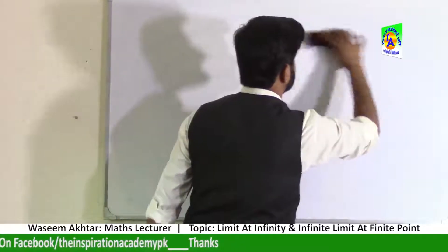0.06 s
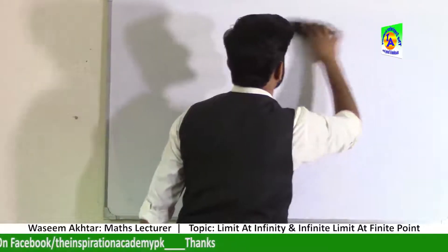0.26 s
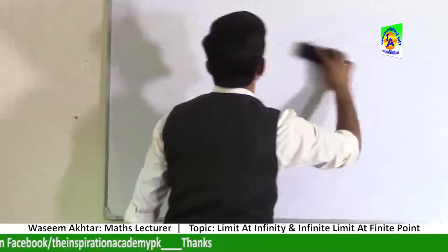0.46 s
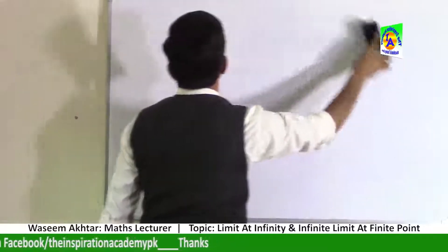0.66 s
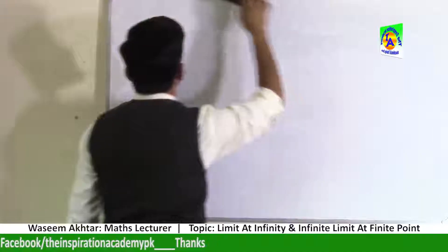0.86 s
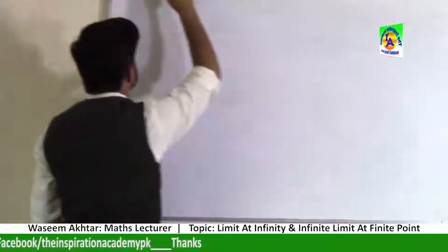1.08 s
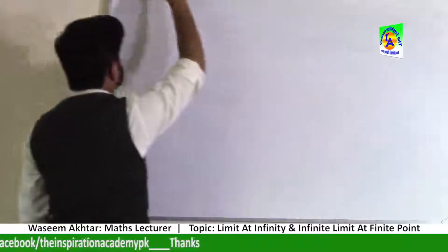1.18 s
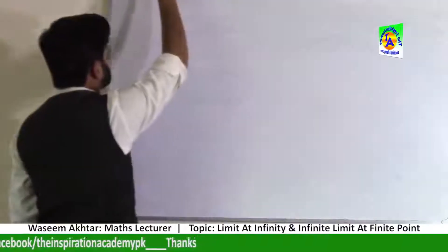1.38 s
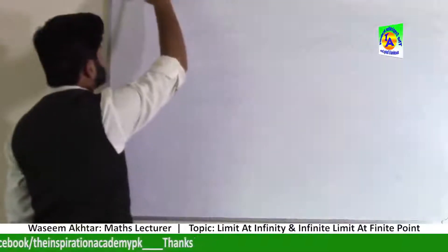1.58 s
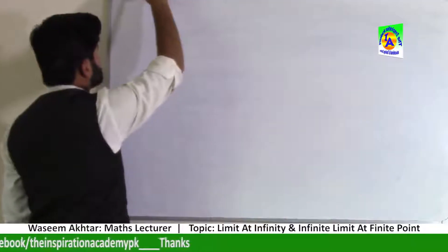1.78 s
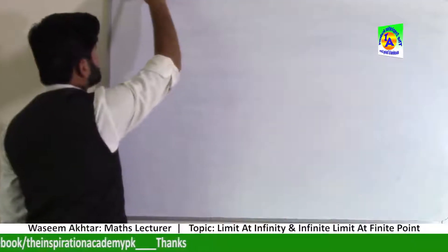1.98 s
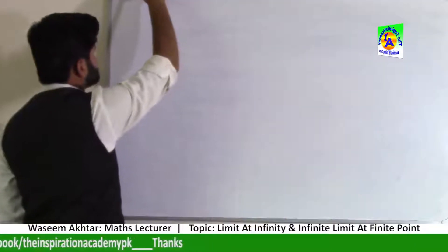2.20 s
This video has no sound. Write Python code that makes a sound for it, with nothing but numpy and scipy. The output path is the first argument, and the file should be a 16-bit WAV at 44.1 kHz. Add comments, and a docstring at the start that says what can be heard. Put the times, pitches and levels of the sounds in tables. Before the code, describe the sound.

A felt eraser rubs across a whiteboard in quick, softly hissing strokes, then fades. A light tap with a low thud follows, then a soft knock and one hollow click, over faint classroom hum.

```python
"""A felt eraser hisses across a whiteboard in quick strokes: countless tiny fibre slips, with catches,
flicks and thin squeals. A faint hiss lingers. A light tap comes with a low thud of the flexing board.
A soft knock and one hollow click follow, the click a cavity pulse with sharp ringing contacts.
The classroom rings briefly over low rumble, mains hum, hiss and a faint electrical buzz."""
import sys
import numpy as np
from scipy import signal
from scipy.fft import rfft, irfft, next_fast_len
from scipy.io import wavfile
from scipy.ndimage import uniform_filter1d

SR = 44100
rng = np.random.default_rng(int(sys.argv[2]) if len(sys.argv) > 2 else 0)


def unload_audio(sound):
    """Save the sound as a 16-bit wav file, at the path given as the first command line argument."""
    columns = np.transpose(np.atleast_2d(sound))
    # keep every value between -1 and 1, then stretch to whole-number steps
    steps = np.round(np.clip(columns, -1, 1) * 32767)
    wavfile.write(sys.argv[1], SR, steps.astype(np.int16))


N = 98960
TIME_S = np.arange(N) / SR


def amp(db):
    """Decibels to gain."""
    return 10 ** (np.asarray(db) / 20)


def unit(x):
    """Scale to rms 1."""
    return x / np.sqrt(np.mean(x ** 2) + 1e-20)


def along(points, hz):
    """Interpolate (freq_hz, value) points on a log axis."""
    freqs_hz, values = np.transpose(points)
    return np.interp(np.log(hz + 1), np.log(freqs_hz + 1), values)


def level(points):
    """Gain per sample from (time_s, level_db) points."""
    return amp(np.interp(TIME_S, *np.transpose(points)))


def swell(centre_s, width_s):
    """Gaussian rise and fall, peak 1."""
    return np.exp(-2 * ((TIME_S - centre_s) / width_s) ** 2)


def filtered(x, response):
    """Zero-phase filter with gain response(hz)."""
    size = next_fast_len(N + SR // 2)
    return irfft(rfft(x, size) * response(np.fft.rfftfreq(size, 1 / SR)), size)[..., :N]


def coloured(x, spectrum):
    """x shaped by a spectrum, rms 1."""
    return unit(filtered(x, lambda hz: amp(along(spectrum, hz))))


def noise(spectrum):
    """Coloured noise, rms 1."""
    return coloured(rng.standard_normal(N), spectrum)


def band(centre_hz, q):
    """Noise in one resonance, rms 1."""
    white = rng.standard_normal(N)
    return unit(filtered(white, lambda hz: 1 / (1 + (q * (hz / centre_hz - centre_hz / (hz + 1))) ** 2)))


def grainy_noise(streak_db, grain_db, grains_per_s=900):
    """Noise with sparse grains and shifting streaks of colour."""
    grains = (rng.random(N) < grains_per_s / SR) * rng.standard_normal(N)
    frames = signal.stft(rng.standard_normal(N) + amp(grain_db) * unit(grains), nperseg=512)[2]
    streaks = uniform_filter1d(rng.standard_normal(frames.shape), size=4, axis=0)
    streaks = uniform_filter1d(streaks, size=9, axis=1)
    return signal.istft(frames * amp(streak_db * unit(streaks)), nperseg=512)[1][:N]


# Hiss envelope, one list per stroke: time_s, relative_db
STROKES = [
    [(0.0, -49.5), (0.08, -50), (0.11, -54)],
    [(0.15, -55), (0.172, -57), (0.232, -52), (0.32, -55.5)],
    [(0.36, -56), (0.546, -50), (0.566, -55.5), (0.678, -52.5), (0.8, -68.5), (0.86, -92)],
]
# Felt spectrum, pressed hard: freq_hz, density_db
FELT_HARD = [(400, -26), (900, -25), (1900, -10.5), (2600, -16), (3400, -11.5), (4700, -8.5), (5500, -12),
             (6000, -6), (8500, 1.5), (13300, 1.5), (15800, -8)]
# Felt spectrum, pressed lightly: freq_hz, density_db
FELT_LIGHT = [(400, -21.5), (800, -19), (1300, -13.5), (2300, -17), (3300, -12), (5700, -15), (6900, -6),
              (7600, -7), (9400, 0), (13500, -3), (15800, -9.5)]

def wipe(gain_db=1, ease_centre_s=0.24, ease_length_s=0.15):
    """Tiny slips of felt: the hiss follows hand speed and thins as the pressure eases."""
    points = np.concatenate(STROKES)
    fade_out = [points[-1, 0] + 0.045, -110]
    envelope = amp(gain_db) * level(np.vstack([points, fade_out]))
    slips = grainy_noise(streak_db=2, grain_db=-8)
    eased = np.clip((TIME_S - ease_centre_s) / ease_length_s + 0.5, 0, 1)
    return envelope * ((1 - eased) * coloured(slips, FELT_HARD) + eased * coloured(slips, FELT_LIGHT))


# Room rumble spectrum: freq_hz, density_db
RUMBLE_SPECTRUM = [(15, -13.5), (25, -5), (38, -3.5), (50, -4), (75, -12.5), (118, -4.5), (145, -7),
                   (185, -16), (300, -16.5), (420, -24.5), (600, -30), (900, -42.5), (1600, -90.5)]
# Background hiss spectrum: freq_hz, density_db
HISS_SPECTRUM = [(300, 1), (700, 2.5), (1300, 4), (2500, -4.5), (4300, -9.5), (5500, -6), (8000, -10.5),
                 (12000, -13.5), (15800, -20)]
# Electrical tick filter: freq_hz, gain_db
BUZZ_FILTER = [(500, -46), (3000, -3.5), (5500, 2.5), (8000, 0.5), (12000, -8.5), (15800, -13.5)]
# Brief dips in hiss and buzz: centre_s, width_s, depth_db
DIPS = [(1.974, 0.015, 20), (2.064, 0.011, 23), (2.114, 0.021, 11.5), (2.151, 0.011, 23.5),
        (2.207, 0.016, 29)]

def background(mains_hz=50, hum_db=-61.5, rumble_db=-63.5, hiss_db=-77, tick_db=-52):
    """Rumble, mains hum, hiss and a buzz of one tick per mains half cycle."""
    tick_times_s = np.arange(0.0089, TIME_S[-1], 0.5 / mains_hz)
    ticks = np.zeros(N)
    ticks[(tick_times_s * SR).astype(int)] = amp(tick_db + rng.standard_normal(len(tick_times_s)))
    buzz = filtered(ticks, lambda hz: amp(along(BUZZ_FILTER, hz)))
    hum = amp(hum_db) * np.sqrt(2) * np.sin(2 * np.pi * mains_hz * TIME_S)
    rumble = amp(rumble_db) * noise(RUMBLE_SPECTRUM)
    hiss = amp(hiss_db) * noise(HISS_SPECTRUM)
    dip_db = sum(depth_db * swell(centre_s, width_s) for centre_s, width_s, depth_db in DIPS)
    return hum + rumble + amp(-dip_db) * (hiss + buzz)


# Felt squeals: centre_s, width_s, level_db, pitch_hz
SQUEALS = [(0.057, 0.09, -63.5, 5370), (.23, 0.063, -64, 6900), (0.38, 0.1, -62.5, 6980)]

def squeals():
    """The felt squeals thinly in narrow bands."""
    return sum(amp(db) * swell(centre_s, width_s) * band(hz, q=15)
               for centre_s, width_s, db, hz in SQUEALS)


# Felt catching on the board: centre_s, width_s, level_db
CATCHES = [(.125, 0.011, -45.5), (0.341, 0.013, -43.5), (0.584, 0.0039, -54.5)]
# Catch spectrum: freq_hz, density_db
CATCH_SPECTRUM = [(400, -17), (900, -23), (1300, -9), (1900, -18.5), (2500, -20), (5000, -16), (5800, -12),
                  (6800, -2), (8200, -3), (9400, -0.5), (13000, -1), (15800, -7)]

def catches():
    """Friction flares in flat-topped bursts where the felt catches."""
    envelope = sum(amp(db) * np.exp(-(1.28 * (TIME_S - centre_s) / width_s) ** 4)
                   for centre_s, width_s, db in CATCHES)
    return envelope * coloured(grainy_noise(streak_db=4, grain_db=-6.5), CATCH_SPECTRUM)


# Board flexes: centre_s, width_s, level_db, pitch_hz
FLEXES = [(0.163, 0.068, -58.5, 78.6), (0.472, .13, -59.5, 107.4), (0.591, 0.042, -62.5, 193),
          (1.204, 0.032, -48, 74), (1.247, 0.11, -45.5, 42.7), (1.73, 0.02, -58, 89),
          (1.778, 0.027, -62.5, 140.7)]

def board_flex():
    """The panel flexes under the hand in low swells and thuds."""
    out = np.zeros(N)
    for centre_s, width_s, db, hz in FLEXES:
        envelope = swell(centre_s, width_s)
        envelope_rms = np.sqrt(np.mean(envelope ** 2))
        out += amp(db) * envelope_rms * unit(envelope * band(hz, q=1.78))
    return out


# Fibre flicks: time_s, peak_db
FLICKS = [(.3367, -37.5), (.3449, -34), (.5127, -38.5)]

def flicks():
    """Single stiff fibres flick: sharp ticks with the colour of a catch."""
    out = np.zeros(N)
    for time_s, db in FLICKS:
        impulse = np.arange(N) == round(time_s * SR)
        tick = coloured(impulse, CATCH_SPECTRUM)
        out += amp(db) * tick / tick.max()
    return out


# Faint hiss envelope: time_s, level_db
FAINT_HISS_ENVELOPE = [(.7, -72.5), (.87, -75), (1.0, -84.5), (1.12, -72.5), (1.25, -67.5), (1.3, -74.5),
                       (1.42, -75.5), (1.5, -85), (1.58, -77), (1.65, -66.5), (1.68, -61.5), (1.73, -58.5),
                       (1.8, -83), (1.9, -103)]
# Faint hiss spectrum: freq_hz, density_db
FAINT_HISS_SPECTRUM = [(300, 2.5), (1500, 7), (3000, -1), (6000, -1.5), (13000, -3.5), (15800, -10.5)]

def faint_hiss():
    """A faint hiss lingers after the strokes and swells just before the click."""
    texture = grainy_noise(streak_db=3, grain_db=-4.5)
    return level(FAINT_HISS_ENVELOPE) * coloured(texture, FAINT_HISS_SPECTRUM)


# Light contacts: start_s, level_db, pitch_hz, t60_s
TAPS = [(1.1944, -41.5, 3000, 0.0088), (1.1948, -58.5, 1290, 0.14), (1.193, -55, 375, .08),
        (1.211, -59.5, 2570, 0.034), (1.601, -50.5, 200, .12), (1.603, -64, 1300, .08),
        (1.6150, -48, 950, 0.058), (1.6143, -58.5, 8500, .05), (1.621, -58, 1950, 0.053)]

def taps(rise_s=0.00094):
    """Quickly damped contacts with the board: the tap and the soft knock."""
    out = np.zeros(N)
    for start_s, db, hz, t60_s in TAPS:
        age_s = np.maximum(TIME_S - start_s, 0)
        attack = 1 - np.exp(-age_s / rise_s)
        out += amp(db - 60 * age_s / t60_s) * attack * band(hz, q=1.02)
    return out


# Near-wall reflections: delay_s, gain_db
WALLS = [(.0046, -21.5), (.0086, -16.5), (.0135, -28.5), (.0255, -28), (.038, -25)]
# Room decay: freq_hz, t60_s
ROOM_T60 = [(100, 0.21), (1000, 0.5), (3000, .36), (8000, 0.34), (15000, 0.13)]

def classroom(x, tail_db, rise_s=0.006):
    """Direct sound, near-wall reflections and a short diffuse tail."""
    hz, age_s, frames = signal.stft(rng.standard_normal(SR // 2), SR, nperseg=256)
    decay = amp(-60 * age_s / along(ROOM_T60, hz)[:, None])
    attack = 1 - np.exp(-age_s / rise_s)
    tail = signal.istft(frames * decay * attack, SR, nperseg=256)[1]
    early = sum(amp(db) * np.interp(TIME_S - delay_s, TIME_S, x, left=0) for delay_s, db in WALLS)
    return x + early + amp(tail_db) * signal.fftconvolve(x, tail / np.linalg.norm(tail))[:N]


# Sharp contacts of the click: start_s, gain_db
SNAPS = [(1.7222, -38), (1.7242, -39), (1.7270, -39)]
# Modes they excite: pitch_hz, relative_db, t60_s
SNAP_MODES = [(162, -13, 0.076), (430, -8.5, .05), (613, -7, 0.074), (1614, -2.5, 0.033), (1950, 0, 0.021),
              (2310, -6.5, 0.028), (2914, -7.5, .03), (4590, -12, .035), (5310, -8.5, 0.039),
              (6420, -9, .025), (7250, -13.5, .03), (7730, -12.5, .035), (9350, -20, .03),
              (12920, -5.5, .018)]
# Contact crack spectrum: freq_hz, density_db
CRACK_SPECTRUM = [(500, -5), (2000, 2.5), (3500, -8), (7000, -11), (10000, -18), (12600, -3), (15200, -12),
                  (15800, -24.5)]

def click_snaps(crack_db=-5, crack_t60_s=0.016, rise_s=0.00053):
    """Each sharp contact gives a short crack and a brief ring."""
    out = np.zeros(N)
    for start_s, gain_db in SNAPS:
        age_s = np.maximum(TIME_S - start_s, 0)
        ring = sum(amp(db - 60 * age_s / t60_s) * np.sin(2 * np.pi * (hz * age_s + rng.random()))
                   for hz, db, t60_s in SNAP_MODES)
        crack = amp(crack_db - 60 * age_s / crack_t60_s) * noise(CRACK_SPECTRUM)
        attack = 1 - np.exp(-age_s / rise_s)
        out += amp(gain_db) * attack * (ring + crack)
    return out


CLICK_S = 1.7247

def click_cavity(peak_db=-17.5, pitch_hz=991, width_s=0.0018):
    """Hollow body of the click: a cavity tone swells and dies within a few cycles."""
    offset_s = TIME_S - CLICK_S
    return amp(peak_db) * np.exp(-(offset_s / width_s) ** 2) * np.cos(2 * np.pi * pitch_hz * offset_s)


# Click spectrum off the far walls: freq_hz, density_db
ECHO_SPECTRUM = [(88, -24), (150, -4.5), (255, -9.5), (308, -6.5), (498, -11.5), (971, -4), (1320, -12),
                 (1620, -11.5), (3010, -26), (3450, -30), (5860, -34.5), (6500, -27), (9000, -38.5),
                 (11700, -68), (19800, -120)]

def click_echo(gain_db=-49, rise_s=0.0027):
    """Diffuse reverberation of the click, dying first in the high treble."""
    hz, frame_s, frames = signal.stft(noise(ECHO_SPECTRUM), SR, nperseg=256)
    decay = amp(-60 * np.maximum(frame_s - CLICK_S, 0) / along(ROOM_T60, hz)[:, None])
    attack = 1 - np.exp(-np.maximum(TIME_S - CLICK_S, 0) / rise_s)
    return amp(gain_db) * attack * signal.istft(frames * decay, SR, nperseg=256)[1][:N]


# Scattered over direct sound: freq_hz, gain_db
SCATTER_FILTER = [(50, -22), (200, -28), (800, -18), (2500, -15.5), (5000, -13.5), (15000, -15)]

def scattered(x):
    """Scattered sound arrives weaker and with random phase."""
    frames = signal.stft(x, nperseg=256)[2]
    random_phase = np.exp(2j * np.pi * rng.random(frames.shape))
    diffuse = signal.istft(frames * random_phase, nperseg=256)[1][:N]
    return filtered(diffuse, lambda hz: amp(along(SCATTER_FILTER, hz)))


def scene(knock_side_db=-8.5, echo_side_db=0.5, side_hiss_db=-90.5):
    """Nearly mono stereo mix; scattered sound adds a little width, least on the knocks."""
    bed = wipe() + squeals() + faint_hiss() + catches() + flicks() + background()
    echo = click_echo()
    knocks = board_flex() + classroom(click_cavity() + taps(), tail_db=-27)
    knocks += classroom(click_snaps(), tail_db=-15)  # bright contacts carry further
    mid = bed + knocks + echo
    side = scattered(bed + amp(knock_side_db) * knocks + amp(echo_side_db) * echo)
    side += amp(side_hiss_db) * rng.standard_normal(N)
    return np.array([mid + side, mid - side])


def record(dry, cutoff_hz=15850):
    """Brick-wall low-pass."""
    return filtered(dry, lambda hz: hz < cutoff_hz)


dry = scene()
out = record(dry)
unload_audio(out)
```